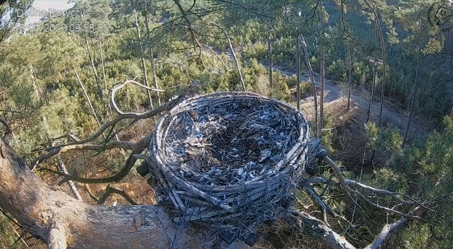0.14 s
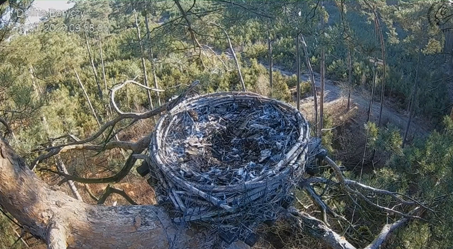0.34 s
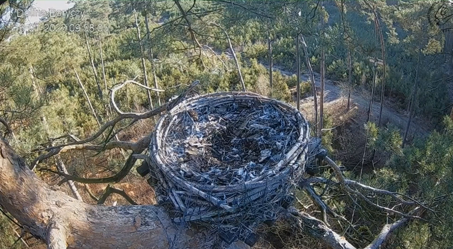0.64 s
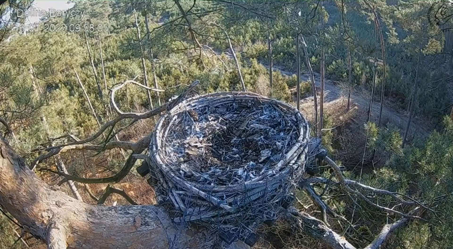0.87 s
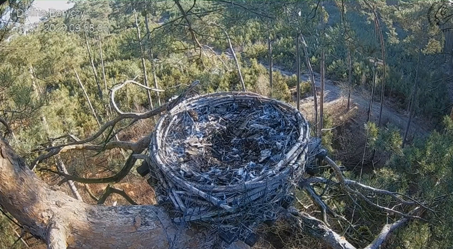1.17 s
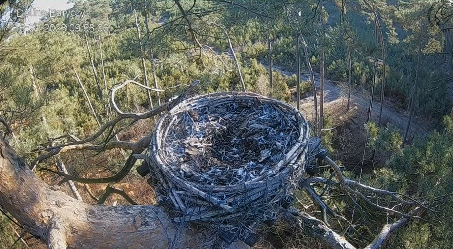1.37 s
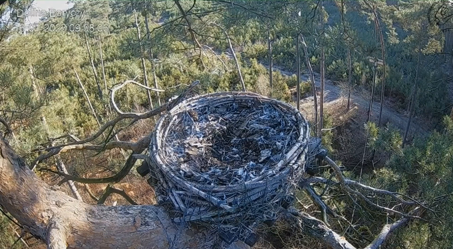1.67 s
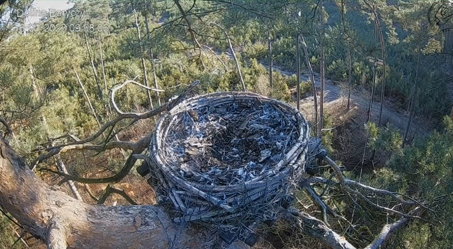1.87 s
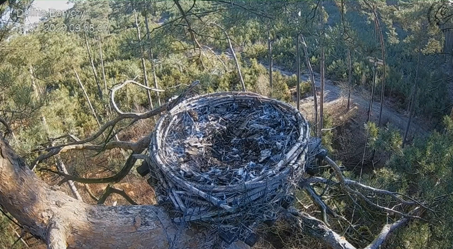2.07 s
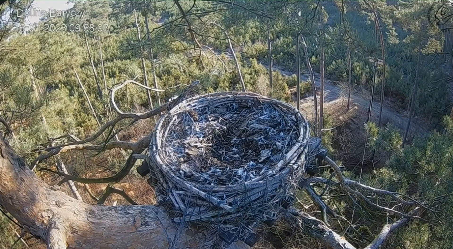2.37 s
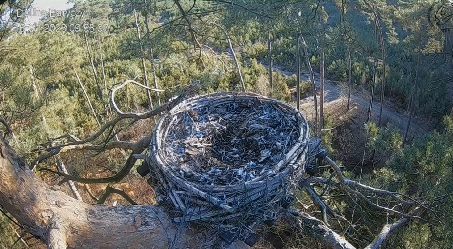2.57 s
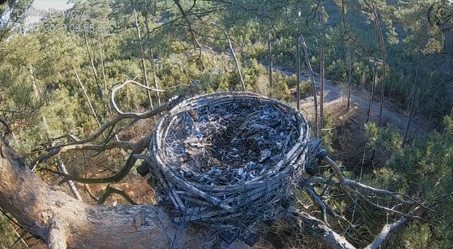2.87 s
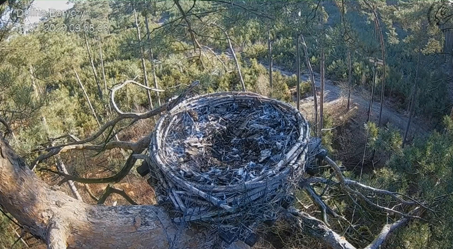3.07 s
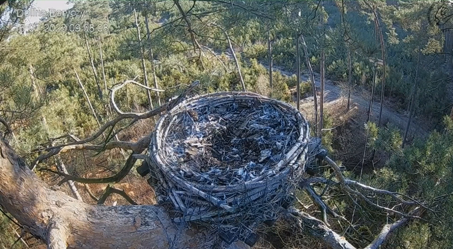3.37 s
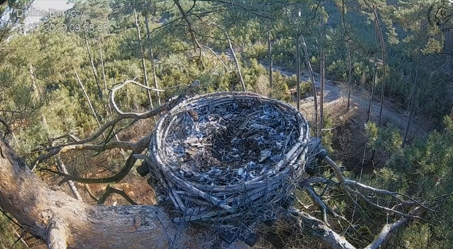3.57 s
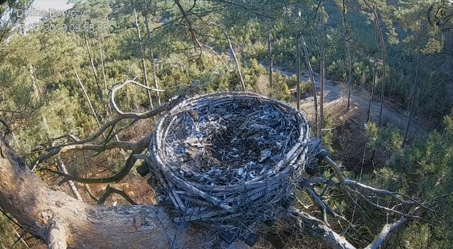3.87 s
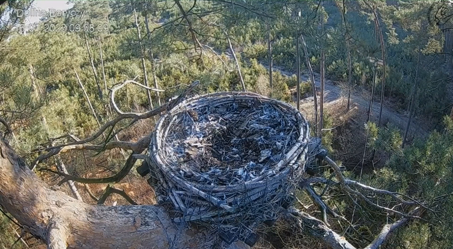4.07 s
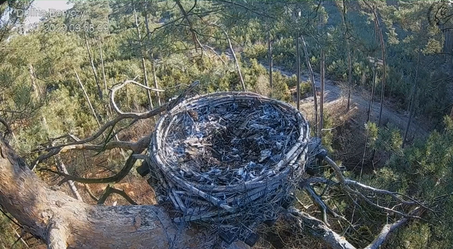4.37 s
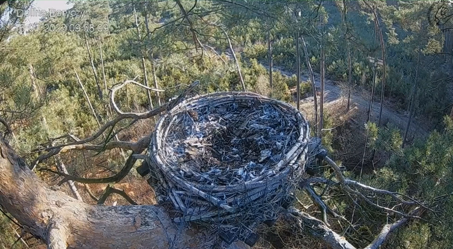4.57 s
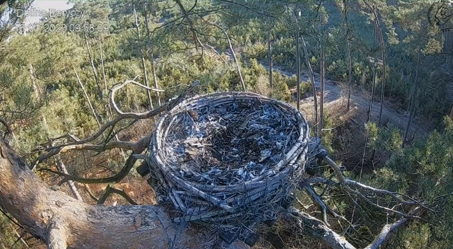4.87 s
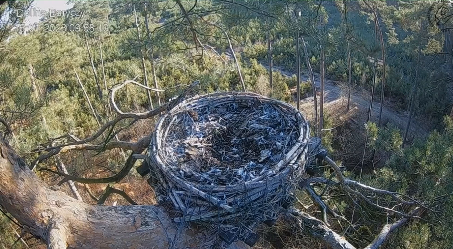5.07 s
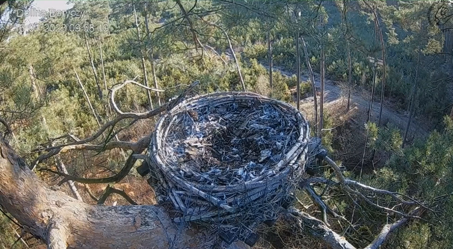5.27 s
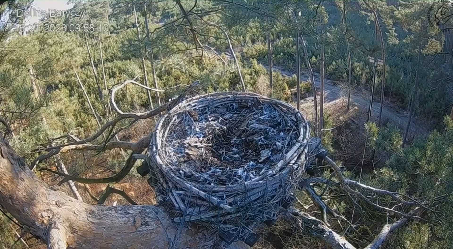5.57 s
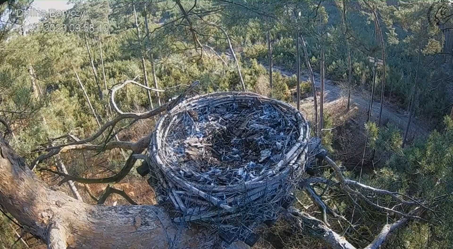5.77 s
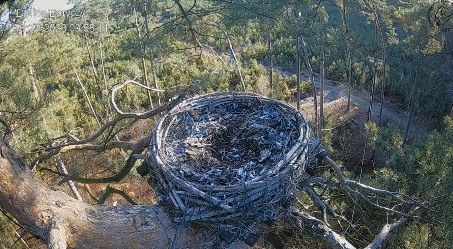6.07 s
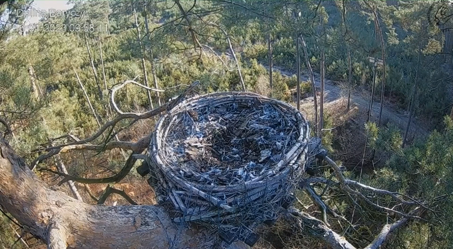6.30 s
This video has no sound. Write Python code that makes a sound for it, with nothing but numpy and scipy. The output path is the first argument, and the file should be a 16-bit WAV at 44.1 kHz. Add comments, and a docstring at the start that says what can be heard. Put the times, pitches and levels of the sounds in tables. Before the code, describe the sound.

A falcon scolds loudly near its nest in a pine wood, rasping arched cries about three a second, with tree echoes and soft wind thumps.

```python
"""A falcon scolds from near its nest high in a pine wood, about three calls a second.
From the start there is a faint background hush, light wind bumping the microphone (filtered noise and
short sine thumps), and an earlier call still hanging in the trees. Most calls open with a low croak
of slow pulses; the calls themselves are rasping, arched cries built from harmonics.
The trees throw the cries back as a scattered tail, and now and then as one clear echo."""
import sys
import numpy as np
from scipy import signal
from scipy.fft import rfft, irfft
from scipy.io import wavfile
from scipy.ndimage import uniform_filter1d, minimum_filter1d

SR = 44100
rng = np.random.default_rng(int(sys.argv[2]) if len(sys.argv) > 2 else 0)


def waveform_to_disk(signal):
    """Save audio, clipped to [-1, 1], as 16-bit WAV at the path in sys.argv[1]."""
    frames = np.transpose(np.atleast_2d(signal))
    scaled = np.clip(frames, -1, 1) * 32767
    samples = np.round(scaled).astype(np.int16)
    wavfile.write(sys.argv[1], SR, samples)


N = 284004
TIME = np.arange(N) / SR
COARSE_TIME = TIME[::20]   # slow curves are worked out at every 20th sample


def from_db(db):
    """Decibels to gain."""
    return np.exp(np.asarray(db) * (np.log(10) / 20))


def rms_one(x):
    """Scale to an average strength (rms) of 1."""
    return x / np.sqrt(np.mean(x ** 2) + 1e-20)


def in_time(rows):
    """Each column of a curve at every sample; the first column is the time in seconds."""
    seconds, *columns = np.transpose(rows)
    return [np.interp(TIME, seconds, column) for column in columns]


def at_hz(points, hz):
    """Read a spectrum, in dB, with straight lines between its points on a log-frequency axis."""
    point_hz, point_db = np.transpose(points)
    return np.interp(np.log(hz), np.log(point_hz), point_db)


def low_pass(x, hz, order=3):
    """Take away what lies above hz."""
    return signal.sosfilt(signal.butter(order, hz, fs=SR, output="sos"), x)


def coloured(spectrum):
    """Noise with the given spectrum, rms 1, nothing below 14 Hz."""
    hz = np.maximum(np.arange(N // 2 + 1) * SR / N, 1)
    white = rfft(rng.standard_normal(N))
    return rms_one(irfft(white * from_db(at_hz(spectrum, hz)) * (hz > 14), N))


def drift(rate):
    """Smooth chance that changes about rate times a second, spread 1."""
    r = np.exp(-2 * np.pi * rate / SR)
    noise = rng.standard_normal(N + SR)   # the first second only settles the filter
    return rms_one(signal.lfilter([1], [1, -2 * r, r * r], noise)[SR:])


def tremble(top_hz):
    """Fast chance that fades out steeply above top_hz, spread 1."""
    smoother = signal.butter(4, top_hz, fs=SR / 20, output="sos")
    coarse = signal.sosfilt(smoother, rng.standard_normal(len(COARSE_TIME)))
    return np.interp(TIME, COARSE_TIME, rms_one(coarse))


def resonate(x, hz, width_hz):
    """A steep-sided resonance, gain 1 on top."""
    edges = [hz - width_hz / 2, hz + width_hz / 2]
    return signal.sosfilt(signal.butter(2, edges, "band", fs=SR, output="sos"), x + 1e-18)


def air(gain_db=4.5, unsteady_db=-4):
    """A faint background hush that rises and sinks, with a low, unsteady rushing noise."""
    # Each row: time in seconds, level in dB before gain_db
    air_level = [(0.0, -53), (0.9, -60), (1.3, -62), (1.45, -65), (1.7, -63), (2.9, -61), (3.55, -56),
                 (4.5, -57.5), (5.0, -57), (5.45, -63), (5.7, -57), (6.44, -58)]
    # The colour of the hush. Each row: frequency in Hz, level in dB
    hush = [(150,1),(400,-11.5),(600,3),(1000,-1.5),(2000,-3.5),(4000,-3),(8000,-17),(15500,-16)]
    rush = rms_one(resonate(rng.standard_normal(N), 343, 260))
    unsteady_rush = from_db(unsteady_db + 5.6 * tremble(16.1)) * rush
    return from_db(in_time(air_level)[0] + gain_db) * (coloured(hush) + unsteady_rush)


def wind(gain_db=3, lumpy_db=5.0, thump_db=-2, cycles=0.31, puff_db=-17):
    """A lumpy low rumble, and single eddies that push the diaphragm for a cycle or two with a soft puff."""
    # Wind on the microphone. Each row: time in seconds, level in dB before gain_db
    wind_level = [(0.0, -42.5), (0.18, -45.5), (0.66, -54), (0.84, -39), (1.0, -35), (1.12, -51.5),
                  (1.77, -64), (1.96, -56.5), (2.9, -51.5), (3.66, -54), (3.87, -28), (4.1, -43),
                  (4.45, -40), (4.7, -48.5), (5.52, -44.5), (5.9, -34.5), (6.3, -52), (6.44, -39)]
    # The colour of the rumble. Each row: frequency in Hz, level in dB per Hz of bandwidth
    buffet = [(12, -53), (20, 12), (38, -1), (57, 2), (139, -13.5), (195, -28), (300, -19), (390, -22),
              (660, -120)]
    # Eddies that thump the microphone. Each row: start in seconds, level in dB before thump_db, pitch in Hz
    thumps = [(0.388, -19, 58), (0.567, -19, 39.4), (0.844, -7.5, 48.35), (0.924, -14, 37.8),
              (1.074, -20.5, 39.5), (2.366, -19.5, 37.6), (2.655, -25, 37.5), (2.813, -25.5, 50.8),
              (3.285, -15, 38.3), (3.726, -15.5, 55), (5.051, -16.5, 38), (5.088, -12.5, 38),
              (5.258, -19, 36.8), (5.784, -14.5, 59.56), (5.959, -11.5, 36.2), (6.115, -15, 121.8),
              (6.23, -10.5, 36.8)]
    rumble_db = in_time(wind_level)[0] + gain_db + lumpy_db * tremble(14.1)
    out = from_db(rumble_db) * coloured(buffet)
    puff_colour = [(40, -2.5), (100, 4.5), (180, -11), (350, -17.5), (800, -25.0), (2000, -67.0)]   # Hz, dB
    puff = from_db(puff_db) * coloured(puff_colour)
    for start, db, hz in thumps:
        span = slice(int(start * SR), int(start * SR) + SR // 4)
        age = (TIME[span] - start) * hz   # in cycles
        swell = age / cycles * np.exp(1 - age / cycles)   # quick rise, slower fade
        out[span] += from_db(db + thump_db) * swell * (np.sin(2 * np.pi * age) + puff[span])
    return signal.sosfilt(signal.butter(1, 15, "high", fs=SR, output="sos"), out)


def wood(voice, t60=0.47, first_s=0.1035, near_db=-7, dull_hz=7500):
    """Trunks scatter the voice: a few near ones at once, most of them after a tenth of a second."""
    # How much of the voice the wood returns. Each row: time in seconds, level in dB
    returned = [(0, -20.5), (0.7, -16), (1.3, -23.5), (2.5, -23), (2.9, -12.5), (4.4, -15), (5.2, -21.5),
                (6.44, -21)]
    lag = np.arange(SR) / SR
    trunks = rng.standard_normal(SR) * (rng.random(SR) < 400 / SR)   # about 400 reflections a second
    near = from_db(near_db)
    arrival = np.interp(lag, [.004, .01, first_s, first_s + 0.0087], [0, near, near, 1])
    # the tail dies by 60 dB in t60 seconds
    response = rms_one(trunks * arrival * from_db(-60 * lag / t60)) / np.sqrt(SR)
    # the bird is already scolding as the scene opens: an earlier call still hangs in the trees
    earlier = voice[int(.05 * SR):int(.35 * SR)]
    scattered = signal.fftconvolve(np.r_[earlier, voice], response)[len(earlier):len(earlier) + N]
    # shifting paths add and cancel, so each harmonic of the tail flutters on its own
    detour_s = .003 + .00018 * tremble(20)
    detoured = np.interp(TIME - detour_s, TIME, scattered)
    scattered = (scattered + detoured) / np.sqrt(2)
    return low_pass(scattered, dull_hz) * from_db(in_time(returned)[0])


def gate(start, end, edge_s):
    """One between start and end, with short ramps outside, on the coarse time."""
    return np.interp(COARSE_TIME, [start - edge_s, start, end, end + edge_s], [0, 1, 1, 0])


def wandering_resonance(x, hz, width_hz):
    """A resonance whose centre hz moves from sample to sample."""
    turn = np.exp(2j * np.pi * np.cumsum(hz) / SR)
    # shift the centre down to 0 Hz, smooth there, and shift back
    return np.real(turn * low_pass(x / turn, width_hz / 2, order=1))


def croaks(gain_db=3, top_hz=3700, bottom_hz=700, edge_s=0.0048, pulse_hz=290, uneven=.05):
    """Slow uneven pulses ring shifting throat resonances, mostly before a cry, once just after one."""
    # Each row: start in seconds, end in seconds, level of the lower resonances in dB before gain_db
    croak_times = [(0.063, 0.124, -34), (0.366, 0.382, -25.5), (0.661, 0.682, -29), (0.921, 0.976, -31),
                   (1.189, 1.229, -28), (1.495, 1.527, -40.5), (1.828, 1.87, -40), (2.188, 2.237, -47.5),
                   (2.528, 2.578, -51.5), (2.851, 2.921, -47), (3.142, 3.209, -48.5), (3.438, 3.491, -44.5),
                   (3.748, 3.828, -36.5), (4.041, 4.112, -36.5), (4.325, 4.393, -38.5), (4.639, 4.709, -41),
                   (4.984, 5.021, -32), (5.089, 5.115, -45), (5.325, 5.403, -38), (5.501, 5.524, -33),
                   (5.652, 5.732, -34.5), (5.987, 6.06, -33), (6.007, 6.031, -39.5), (6.28, 6.32, -30.5)]
    # Lower and upper resonances of the croak. Each row: middle frequency in Hz, width in Hz
    low_modes = [(1400,260),(1750,81),(2050,1400)]
    high_modes = [(2650,38),(3050,37)]
    even_db = -31.5     # at this level both groups are equal
    brightens = 0.29    # dB that the upper group gains on the lower one per dB of level
    cycles = np.cumsum(pulse_hz * np.exp(.13 * drift(8.6) + uneven * tremble(150))) / SR
    # one click each time a cycle is completed, over a trace of noise
    pulses = np.diff(np.floor(cycles), prepend=0) * from_db(2.5 * tremble(100))
    pulses = pulses + .002 * rng.standard_normal(N)
    groups = []
    for modes in low_modes, high_modes:
        rings = []
        for hz, width_hz in modes:
            ring = wandering_resonance(pulses, hz + 130 * tremble(20), width_hz)
            rings.append(rms_one(ring * from_db(4 * tremble(30))))
        middle_hz = np.mean(modes, axis=0)[0]
        groups.append(rms_one(resonate(sum(rings), middle_hz, 1600)))
    lower, upper = groups
    half_edge_s = edge_s / 2
    coarse_level = sum(from_db(db) * gate(start + half_edge_s, end - half_edge_s, edge_s)
                       for start, end, db in croak_times)
    level = np.interp(TIME, COARSE_TIME, coarse_level)
    out = level * (lower + (level / from_db(even_db)) ** brightens * upper)
    # the beak is still nearly shut, so the croak stays dull
    dull = signal.butter(3, [bottom_hz, top_hz], "band", fs=SR, output="sos")
    return from_db(gain_db) * signal.sosfilt(dull, out)


def syrinx():
    """Every syllable is one arch of pitch and effort; neighbours that touch run into each other."""
    # Syllables; pitch is that of the strong second harmonic. Each row: start, crest and end in seconds,
    # opening pitch in Hz, crest pitch in Hz, crest level in dB, overtones in dB before later trims
    syllables = [(0.09, 0.145, 0.22, 1893, 2281, -6.5, -5.5), (0.186, 0.224, 0.26, 2225, 2380, -7, -5),
                 (0.289, 0.31, 0.33, 2263, 2398, -9.5, -17.5), (0.394, 0.511, 0.54, 2071, 2464, -3.5, -7),
                 (0.686, 0.689, 0.72, 2200, 2218, -15, -2.5), (0.72, 0.795, 0.84, 2095, 2428, -6.5, -2.5),
                 (0.947, 1.033, 1.085, 2042, 2395, -5.0, -3.5), (1.237, 1.303, 1.369, 2169, 2279, -8, -3.5),
                 (1.531, 1.561, 1.585, 1914, 2096, -13, -6.5),
                 (1.639, 1.662, 1.704, 2194, 2264, -8.5, -9.5),
                 (1.88, 2.006, 2.037, 1993, 2266, -11, -12.5), (2.248, 2.348, 2.4, 1907, 2283, -16, -14.5),
                 (2.584, 2.619, 2.66, 1963, 2080, -39.5, -1.5), (2.68, 2.7, 2.725, 2164, 2264, -16, -6.5),
                 (2.96, 3.001, 3.037, 2197, 2314, -18, -3.5), (3.248, 3.289, 3.32, 2173, 2338, -15, -1.5),
                 (3.491, 3.495, 3.52, 2034, 2073, -32, 10), (3.565, 3.586, 3.626, 2249, 2313, -12, -1),
                 (3.834, 3.904, 3.925, 2139, 2287, -10.0, 0.5),
                 (4.128, 4.166, 4.243, 2177, 2336, -10.5, -4.5),
                 (4.406, 4.478, 4.508, 2178, 2301, -7.5, -6), (4.717, 4.813, 4.845, 2150, 2245, -14, -3),
                 (5.032, 5.062, 5.13, 2048, 2068, -22, 2), (5.126, 5.155, 5.19, 2200, 2320, -5.5, -3.5),
                 (5.408, 5.479, 5.506, 2194, 2302, -9.0, -1), (5.697, 5.7, 5.71, 1902, 2100, -20, 4.5),
                 (5.74, 5.756, 5.767, 2151, 2192, -9, -5.5), (5.82, 5.828, 5.863, 2343, 2340, -4, -6.5),
                 (6.071, 6.137, 6.169, 2214, 2259, -5.5, -8.5), (6.333, 6.336, 6.37, 1990, 2093, -18, -8),
                 (6.396, 6.443, 6.53, 2098, 2186, -9, -7)]
    # Moments when the voice breaks into a rasp. Each row: middle in seconds, length in seconds,
    # rasp in dB relative to the whistle, before it levels off and before the rasp's own gain
    breaks = [(0.104, 0.062, -13), (0.201, 0.024, -12), (0.208, 0.025, -9), (0.439, 0.061, -3.5),
              (0.49, 0.037, -10), (0.701, 0.06, -8), (0.76, 0.046, -15.5), (0.967, 0.11, -17),
              (1.085, 0.061, -7), (1.246, 0.055, -9.5), (1.366, 0.052, -11), (1.71, 0.07, -10.5),
              (3.031, 0.067, -19), (3.828, 0.044, -10.5), (3.939, 0.076, -6.5), (4.393, 0.018, -11.5),
              (4.501, 0.052, -10), (4.749, 0.132, -18.5), (5.044, 0.057, -3.5), (5.414, 0.059, -8.5),
              (5.478, 0.067, -13.5), (5.758, 0.067, -10.5), (6.074, 0.043, -13.5), (6.351, 0.034, -10.5),
              (6.414, 0.038, -15.5)]
    rise_curve = .8   # shapes the climb: a little faster near the crest
    fall_hz, fall_curve = 295.2, 2.5   # then it drops by this much, slowly at first
    slack_db_per_hz = 0.0273   # the voice is softer the further it lies below its crest
    attack_s, release_s = 0.014, .016
    # between breaks a trace of rasp stays, a little more where the voice is slack
    clear_rasp_db, slack_rasp_db_per_hz = -25, .008
    full_rasp_db = -4.5   # the rasp levels off towards this
    slack_dulls_db_per_hz = 0.0021   # a slack voice has weaker overtones

    t = COARSE_TIME
    columns = np.transpose(syllables)[:, :, None]
    start, crest, end, opening_hz, crest_hz, crest_db, overtone_db = columns
    to_climb = np.clip((crest - t) / np.maximum(crest - start, 1e-3), 0, 1) ** rise_curve
    fallen = np.clip((t - crest) / np.maximum(end - crest, 1e-3), 0, 1.1) ** fall_curve
    slack_hz = (crest_hz - opening_hz) * to_climb + fall_hz * fallen
    fade_in = np.clip((t - start) / attack_s + .7, 0, 1)
    fade_out = np.clip((end - t) / release_s + 0.39, 0, 1)
    level = fade_in * fade_out * from_db(crest_db - slack_db_per_hz * np.maximum(slack_hz, 0))
    # where syllables overlap, each counts by its share of the level
    share = (level + 1e-9) / np.sum(level + 1e-9, axis=0)
    strong_hz = np.sum(share * (crest_hz - slack_hz), axis=0)
    slack_hz = np.sum(share * slack_hz, axis=0)
    overtone_db = np.sum(share * overtone_db, axis=0) - slack_dulls_db_per_hz * slack_hz
    hoarse = from_db(clear_rasp_db + slack_rasp_db_per_hz * slack_hz)
    for middle, length, db in breaks:
        hoarse = hoarse + from_db(db) * np.exp(-(2 * (t - middle) / length) ** 2)
    hoarse = from_db(full_rasp_db) * np.tanh(hoarse / from_db(full_rasp_db))
    curves = strong_hz, level.max(axis=0), hoarse, overtone_db
    return [np.interp(TIME, t, curve) for curve in curves]


def cries(jitter=0.0041, waver_db=4.0, flutter_db=1.67, rasp_db=1, slow_ratio=0.33, fray_db=8, press_db=3,
          easy_hz=2290, bright_db=-0.9, split=0.4, full_db=-10, body_db=-7, loud_top_db=18, rasp_top_hz=6000):
    """The harmonic whistle, and the rasp that a slower, unsteady vibration of the syrinx adds to it."""
    # How the throat colours the harmonics. Each row: frequency in Hz, level in dB
    throat = [(1000,-25),(1250,-12),(2250,19),(3400,-7),(4500,-9),(5100,-28),(5700,-18.5),(6300,-27),(6900,-25.5),(7600,-44),(9200,-45),(10800,-39.5),(12000,-62),(15000,-74)]
    # Resonances of the rasp. Each row: middle frequency in Hz, width in Hz, level in dB
    rasp_modes = [(1086,234,7),(1993,690,3),(2928,530,13.5),(3330,3000,-8.5),(4790,930,-7),(4980,1400,-22),(7160,550,-39.5),(10300,2400,-48.5)]
    # at full rasp: unevenness of the cycles in radians, and the share of turbulence among the pulses
    fray_rad, turbulence = .22, .2

    strong_hz, level, hoarse, overtone_db = syrinx()
    level = level * from_db(flutter_db * tremble(70))
    pitch = strong_hz / 2 * (1 + jitter * tremble(80))
    # uneven cycles fray each harmonic, the high ones most
    phase = 2 * np.pi * np.cumsum(pitch) / SR + fray_rad * hoarse * tremble(210)
    # a hard-pressed, high note wakes the topmost harmonics
    top_db = press_db * np.clip((strong_hz - easy_hz) / 100, -2, 1)
    # a loud note is brighter than a soft one
    effort_db = loud_top_db * (level - from_db(full_db))
    gains, partials = [], []
    for k in range(1, 14):
        gain = from_db(at_hz(throat, k * pitch) + (k > 6) * top_db + (k > 3) * effort_db)
        gains.append(gain)
        partials.append(gain * from_db(waver_db * tremble(45)) * np.cos(k * phase + k * k))
    # overtones: the third harmonic and up, evened out to a common strength
    overtone_strength = np.sqrt(sum(gain ** 2 for gain in gains[2:]))
    overtones = from_db(overtone_db + bright_db) * sum(partials[2:]) / overtone_strength
    strong = np.cos(2 * phase) * from_db(fray_db * hoarse * tremble(220))
    # the fundamental stops growing once the voice is full
    fundamental = from_db(body_db) * np.tanh(level / from_db(full_db)) * partials[0]
    # the slower vibration makes pulses strong and weak in turn: side lines between the harmonics
    shake_hz = pitch * slow_ratio * (1 + .13 * drift(50))
    shake = np.sin(2 * np.pi * np.cumsum(shake_hz) / SR)
    pulses = rms_one(sum(np.cos(k * phase) for k in range(1, 11)) * shake)
    pulses = pulses + turbulence * (1 + np.cos(phase)) * rng.standard_normal(N)
    rasp = rms_one(sum(from_db(db + 4.5 * tremble(45)) * resonate(pulses, hz, width_hz)
                       for hz, width_hz, db in rasp_modes))
    rasp = low_pass(rasp, rasp_top_hz)
    whistle = fundamental + level * (strong + overtones * (1 + split * hoarse * shake))
    return whistle, level * from_db(rasp_db) * hoarse * rasp


def echoes(voice, delay_s=0.16, dull_hz=2900):
    """Now and then the peak of a cry comes back as one clear, duller echo."""
    # Each row: middle of the echo in seconds, half its length in seconds, level in dB
    echo_times = [(0.274, 0.0057, -0.5), (3.425, 0.022, -2.5), (3.718, 0.014, -3), (4.286, 0.041, -7.5),
                  (5.964, 0.028, -23)]
    swells = sum(from_db(db) * np.cos(np.pi / 2 * np.clip((TIME - middle) / half_s, -1, 1))
                 for middle, half_s, db in echo_times)
    return low_pass(swells * np.interp(TIME - delay_s, TIME, voice), dull_hz)


def scene(rough_carry_db=-10):
    """The bird, the wood's answer, wind and hush; the whistle carries further than the rough sounds."""
    whistle, rasp = cries()
    rough = rasp + croaks()
    carried = whistle + from_db(rough_carry_db) * rough
    mix = air() + wind() + wood(carried) + rough + whistle + echoes(carried)
    return mix[None]


def record(dry, cutoff_hz=15800):
    """A limiter eases the loudest peaks down and the top is cut."""
    room = np.minimum(1, .98 / (np.abs(dry) + 1e-9))   # the gain each sample may have
    gain = uniform_filter1d(minimum_filter1d(room, size=301), size=301)
    top_cut = signal.ellip(10, .1, 90, cutoff_hz, fs=SR, output="sos")
    return signal.sosfilt(top_cut, dry * gain)


dry = scene()
out = record(dry)
waveform_to_disk(out)
```